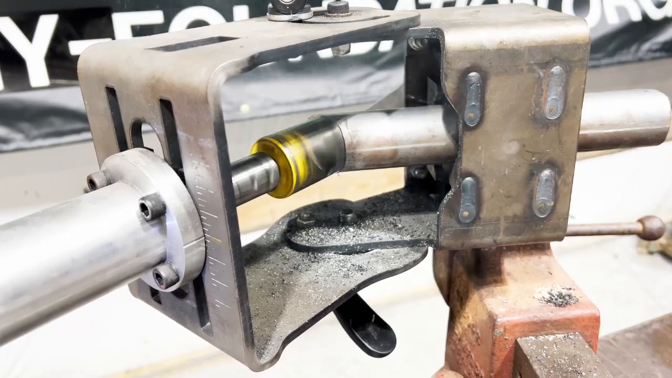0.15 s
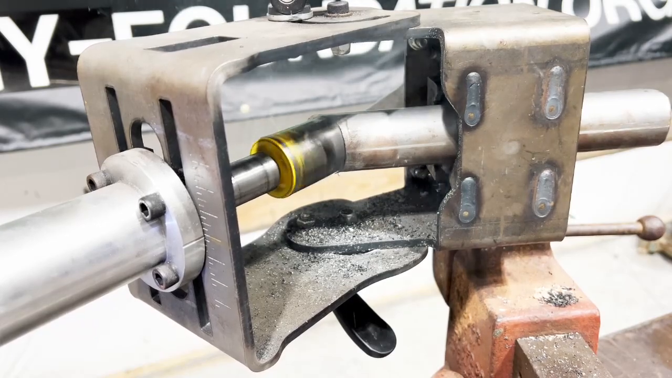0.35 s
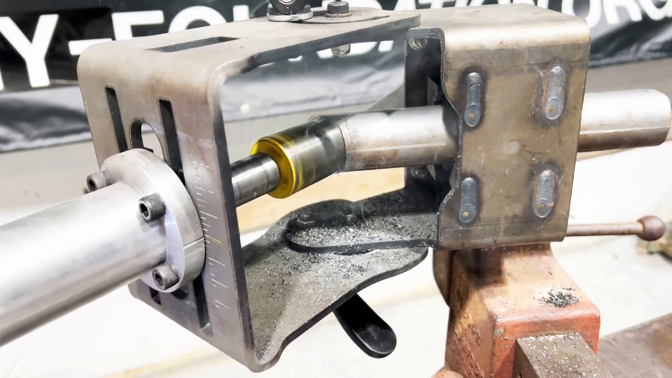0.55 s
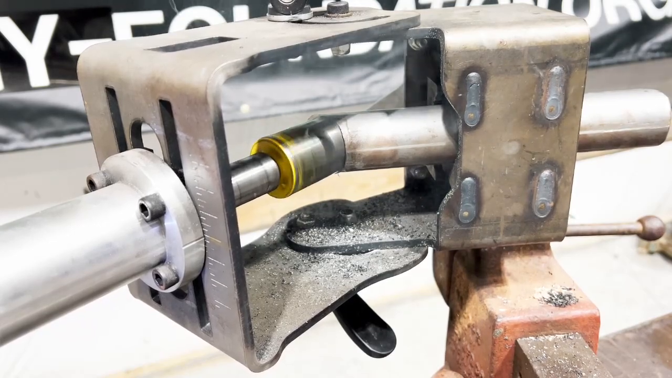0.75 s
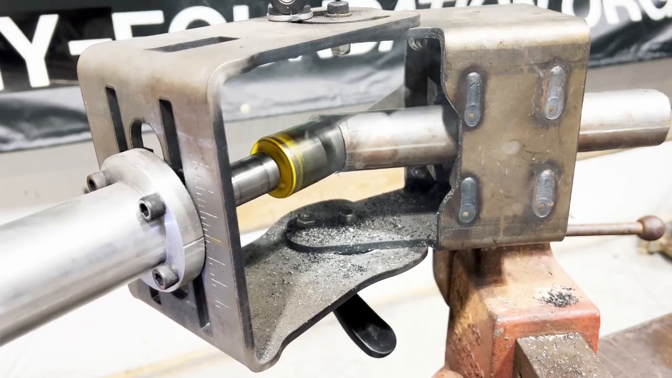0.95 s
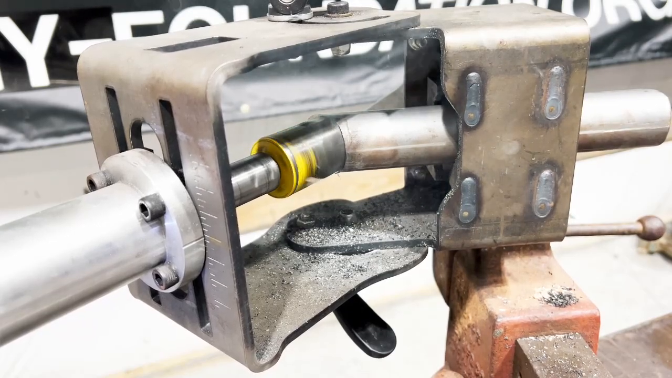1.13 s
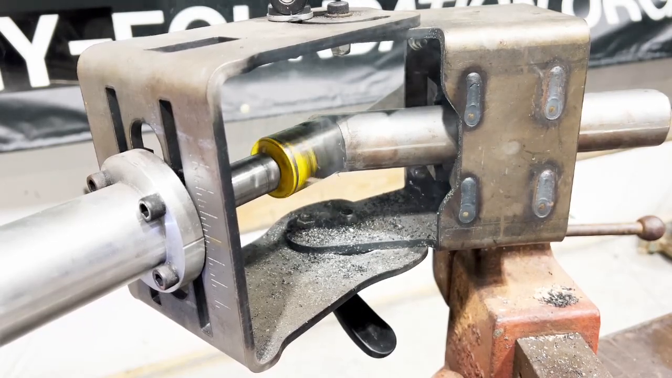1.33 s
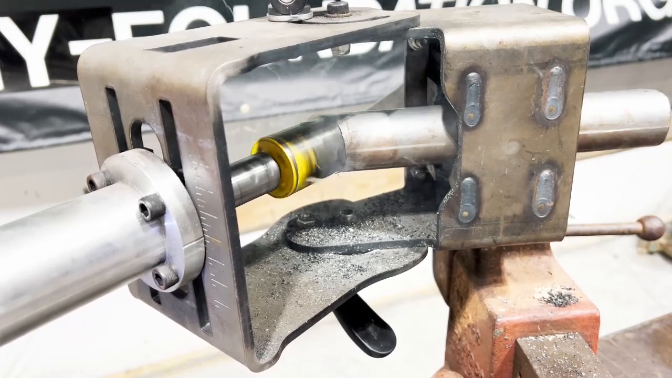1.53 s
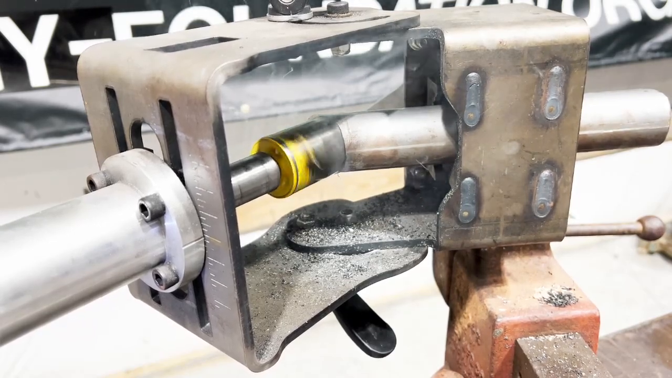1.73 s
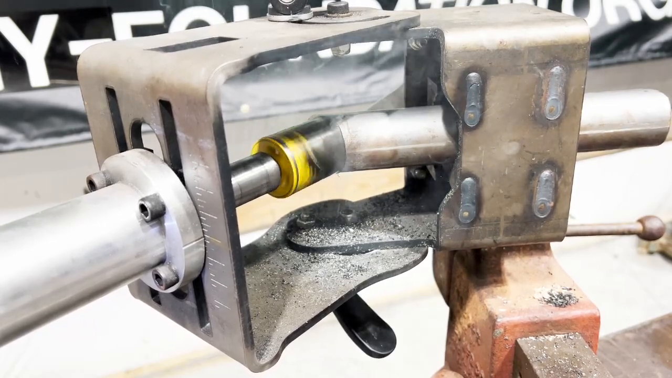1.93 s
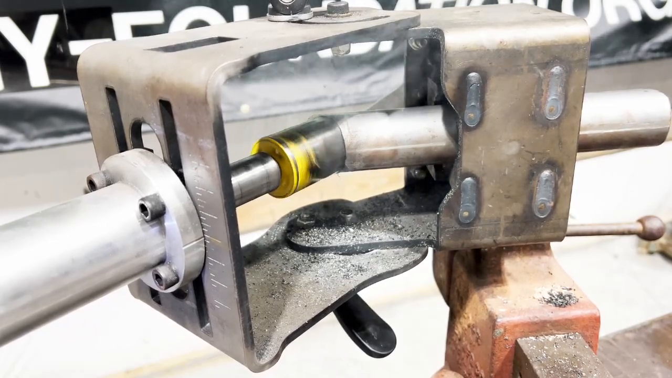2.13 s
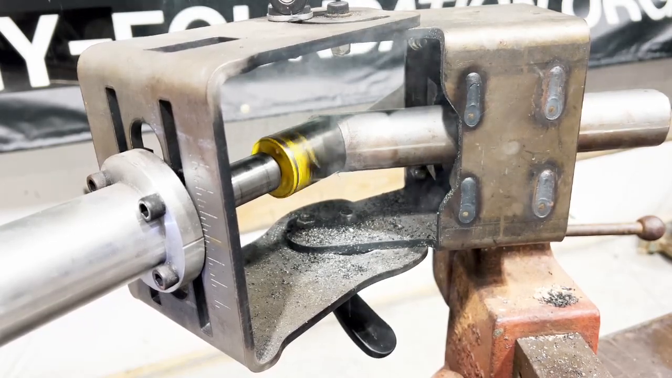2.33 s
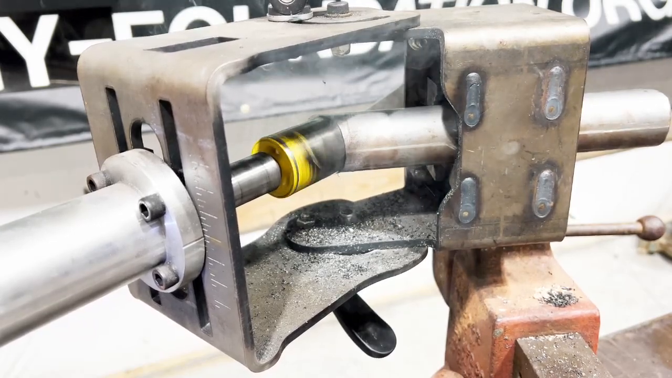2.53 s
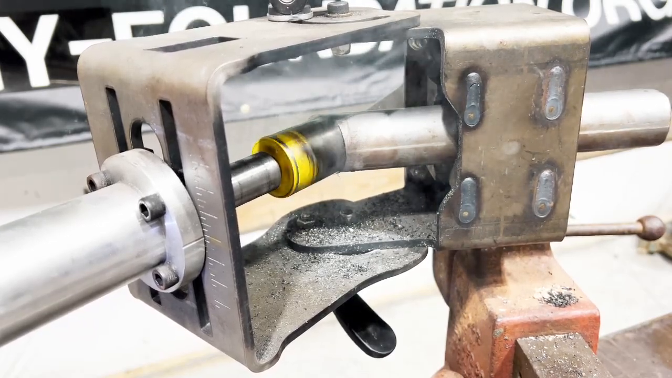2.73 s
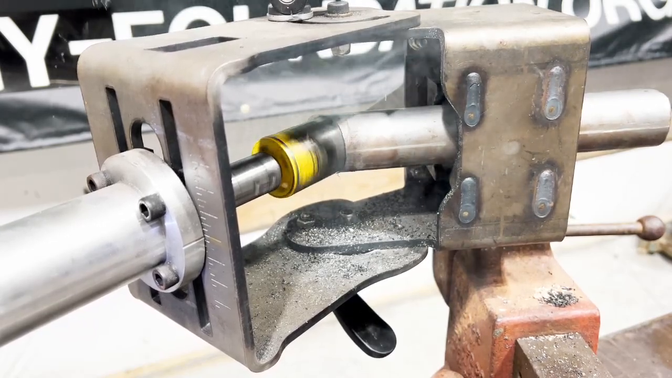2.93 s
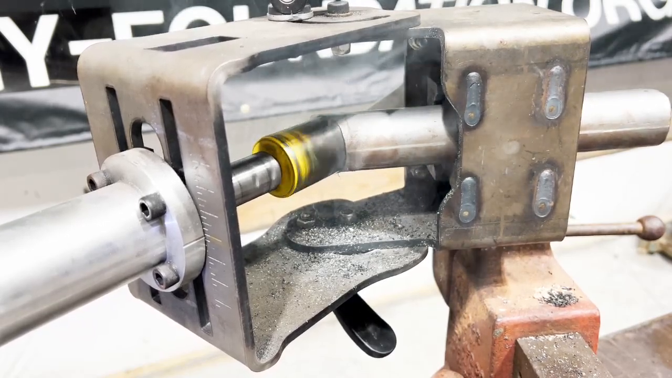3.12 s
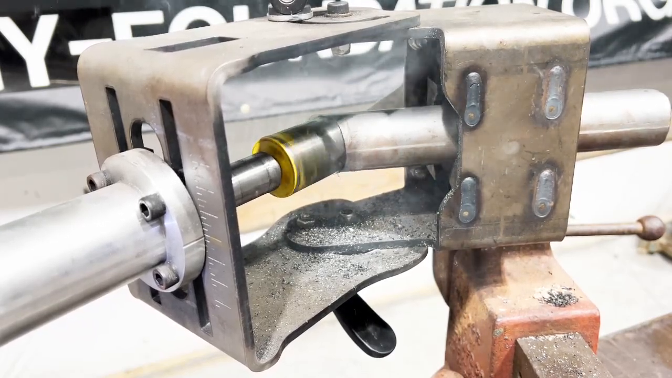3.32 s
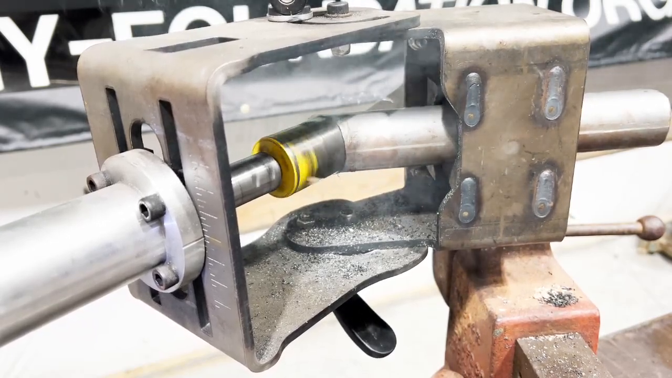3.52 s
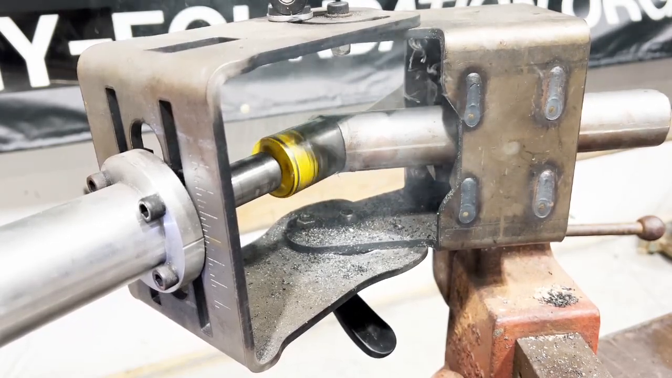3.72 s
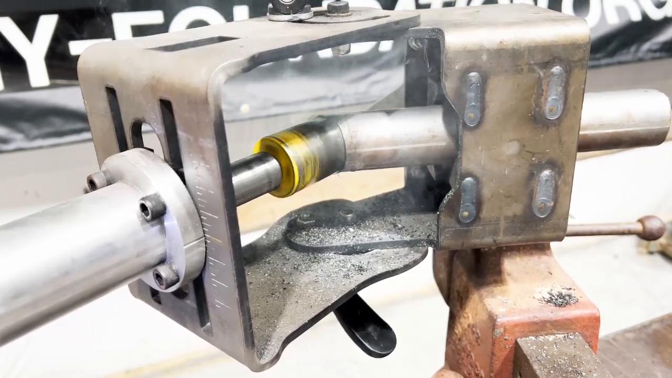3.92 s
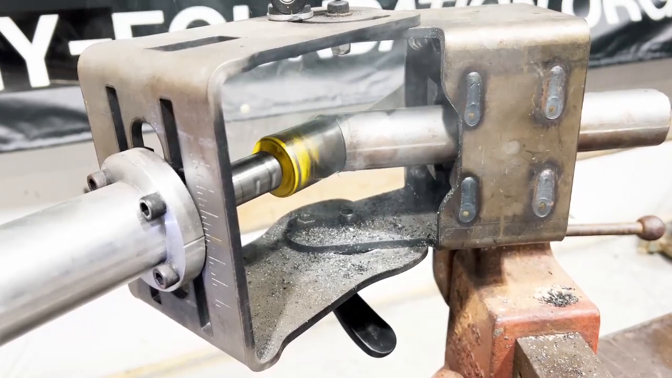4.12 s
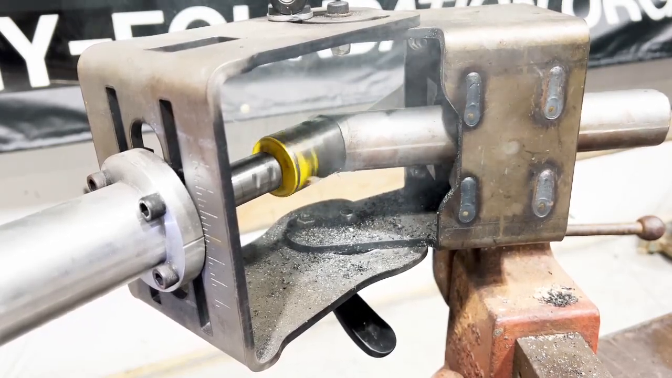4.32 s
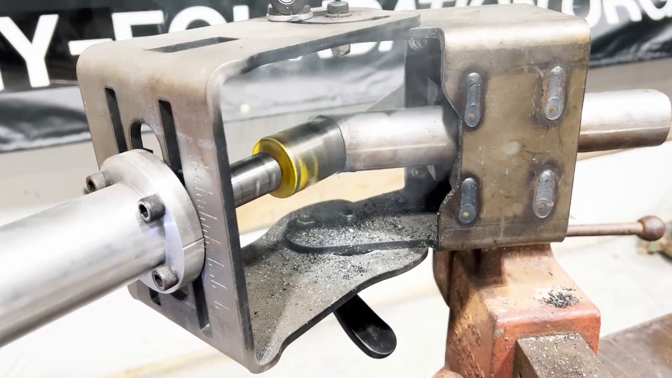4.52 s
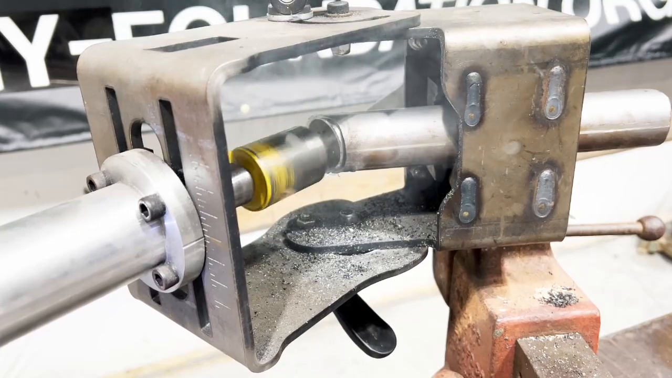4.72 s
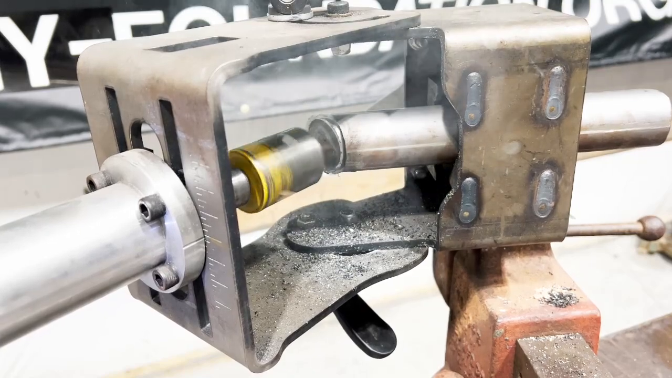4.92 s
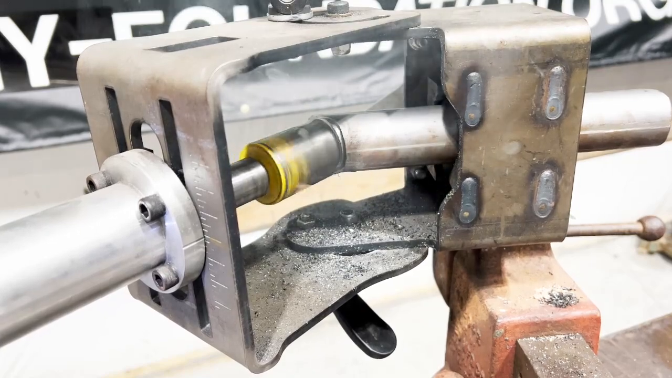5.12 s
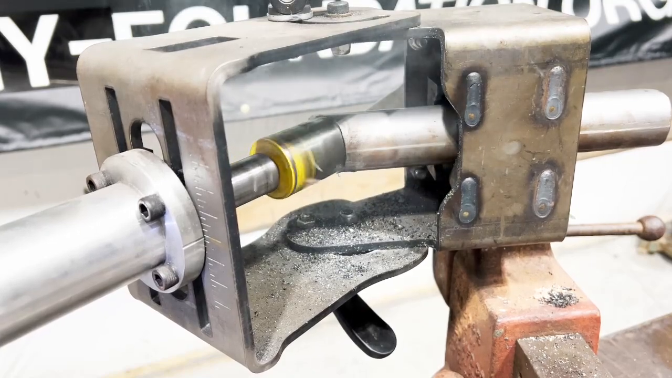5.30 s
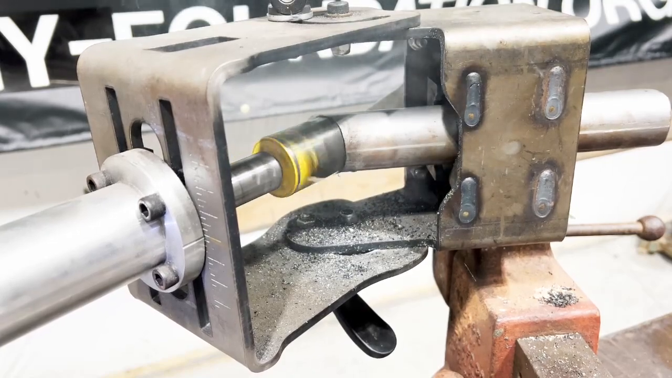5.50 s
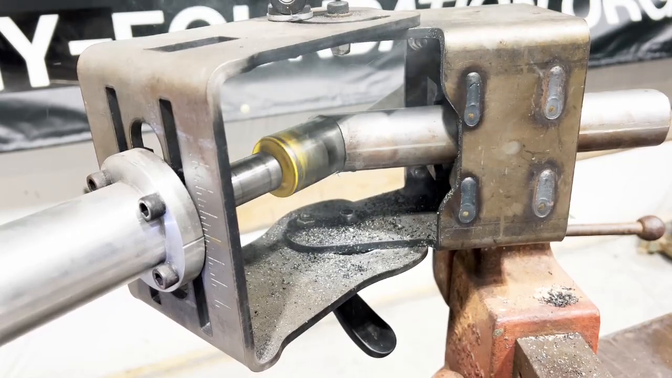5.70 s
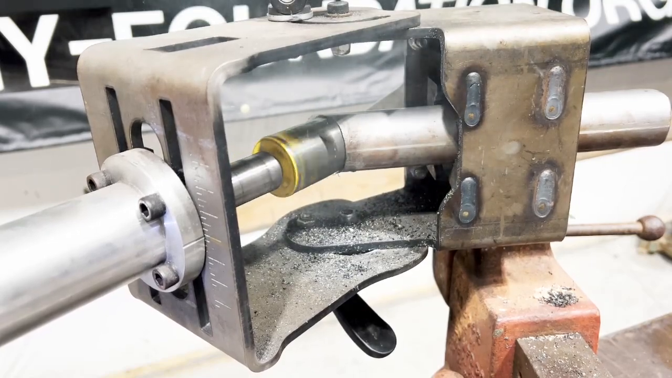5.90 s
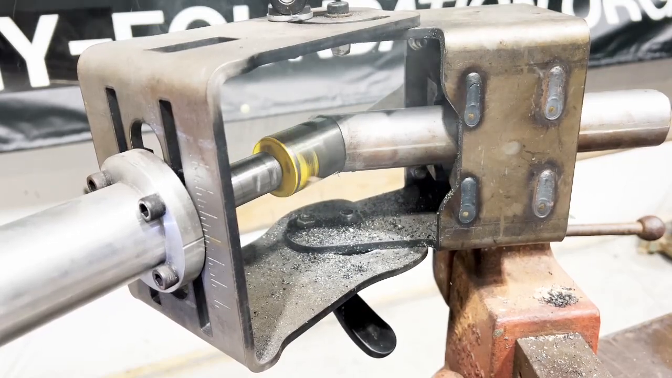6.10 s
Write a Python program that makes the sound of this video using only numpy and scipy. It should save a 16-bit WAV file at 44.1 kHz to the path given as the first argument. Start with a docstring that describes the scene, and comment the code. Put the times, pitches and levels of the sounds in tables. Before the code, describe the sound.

A drill-driven hole saw cuts a steel tube with rapid screeching chirps, backs off briefly as the drill whines, then bites again harder.

```python
"""Hole saw notching a steel tube

In a workshop, a small stereo microphone stands close to an oiled tube clamped in a jig. Once a turn the
saw's highest teeth bite: a short stick-slip squeal that sags in pitch and breaks into a rasp; other
teeth graze in between. The saw is drawn back for a moment, so that the electric drill whines freely,
then it judders on the rim and is fed in again harder."""
import sys
import numpy as np
from scipy import signal
from scipy.fft import rfft, irfft, next_fast_len
from scipy.io import wavfile

SR = 44100
rng = np.random.default_rng(int(sys.argv[2]) if len(sys.argv) > 2 else 0)


def master(y):
    """Save y as 16-bit WAV."""
    cut = np.clip(np.atleast_2d(y).T, -1, 1)
    pcm = np.round(cut * 32767)  # scale
    wavfile.write(sys.argv[1], SR, pcm.astype(np.int16))


N = 271215
TIME = np.arange(N) / SR
FFT_SIZE = 2 * next_fast_len(N // 2 + 4096)
BINS_HZ = np.maximum(np.fft.rfftfreq(FFT_SIZE, 1 / SR), 1)
FIRST_BITE_S, DRAWN_BACK_S, FED_IN_S = .058, 4.55, 5.6
PITCH_SCATTER = .011   # relative spread from turn to turn
DIRECT_ONLY = [[1], [0]]   # ahead of the microphone, a sound has two rows: direct and scattered

# steady rubbing in the kerf, which also stands for the load on the drill: (time [s], level [dB])
FEED = [(0, -36.5), (.4, -37), (.7, -38), (1.05, -37.5), (1.27, -38.5), (1.55, -38), (4.5, -36), (4.6, -37),
        (4.67, -36.5), (4.74, -52), (5.25, -51), (5.32, -35.5), (5.6, -35)]
# spindle speed, sinking as the cut deepens, bogging down at the breakthrough: (time [s], speed [turns/s])
SPINDLE = [(0, 14.347), (1.12, 15.238), (1.686, 14.505), (2.004, 15.332), (3.24, 14.044), (3.547, 14.355),
           (3.781, 13.751), (4.202, 14.309), (4.275, 11.805), (4.441, 14.615), (4.75, 15.596),
           (5.28, 15.596), (5.45, 15.231), (5.68, 15.413), (5.9, 14.636)]


def from_db(db):
    """Decibels to gain."""
    return 10 ** (np.asarray(db) / 20)


def rms_one(x):
    """Scale to unit power."""
    return x / np.sqrt(np.mean(x ** 2) + 1e-20)


def in_time(rows):
    """A (time, value) curve at every sample."""
    return np.interp(TIME, *np.transpose(rows))


def at_bins(rows, column=1):
    """A column of a frequency table at every bin."""
    rows = np.array(rows)
    return np.interp(np.log(BINS_HZ), np.log(rows[:, 0]), rows[:, column])


def phase_of(hz):
    """Running phase of a changing pitch, in radians."""
    return 2 * np.pi * np.cumsum(hz) / SR


def drift(rate_hz):
    """Smooth random wander of unit power."""
    sos = signal.butter(2, min(rate_hz, SR / 4), fs=SR, output="sos")
    return rms_one(signal.sosfilt(sos, rng.standard_normal(N + SR))[SR:])


def colour(x, spectrum):
    """Shape a sound by a spectrum; white noise keeps its power."""
    return irfft(rfft(x, FFT_SIZE) * rms_one(from_db(at_bins(spectrum))), FFT_SIZE)[..., :N]


def resonate(x, hz, width_hz):
    """One damped resonance."""
    r = np.exp(-np.pi * width_hz / SR)
    return signal.lfilter([1 - r, 0, r - 1], [1, -2 * r * np.cos(2 * np.pi * hz / SR), r * r], x)


def swells(times, levels_db, rise_s, fall_s):
    """Envelope of brief contacts, each with a bell-shaped rise and fall."""
    power = np.zeros(N)
    for when, db in zip(times, levels_db):
        near = slice(*np.searchsorted(TIME, [when - 4 * rise_s, when + 4 * fall_s]))
        t = TIME[near] - when
        power[near] += from_db(db) ** 2 * np.exp(-(t / np.where(t < 0, rise_s, fall_s)) ** 2)
    return np.sqrt(power)


def held(times, values):
    """Each sample takes the value of the nearest contact."""
    return values[np.searchsorted((times[1:] + times[:-1]) / 2, TIME)]


def once_a_turn(share=0):
    """Times at which a point of the saw, a share of a turn behind the highest teeth, meets the tube."""
    turns = np.cumsum(in_time(SPINDLE)) / SR
    turns -= np.interp(FIRST_BITE_S, TIME, turns)
    whole = np.arange(int(turns[-1]) + 1)
    times = np.interp(whole, turns, TIME)
    cutting = (times < DRAWN_BACK_S) | (times > FED_IN_S)
    return np.interp(whole[cutting] + share, turns, TIME)


def workshop(x, t60_s=.079):
    """Dense, slightly dull reflections from the bench and walls."""
    t = TIME[:SR // 2]
    tail = rng.standard_normal((2, len(t))) * from_db(-60 * t / t60_s) * (t > .004)
    tail /= np.sqrt(np.sum(tail ** 2, axis=1, keepdims=True))
    tail = signal.sosfilt(signal.butter(1, 7000, fs=SR, output="sos"), tail)
    return signal.fftconvolve(x, tail, axes=1)[:, :N]


def stereo_microphone(x):
    """Direct and scattered sound reach the two capsules with their own level and phase."""
    # the pair close to the jig: (frequency [Hz], left minus right [dB], coherence [0-1], left lead [rad])
    pair = [(100, 0, .9, 0), (650, 3, .2, 0), (1300, 0, .7, 0), (1850, -3, .8, 0), (2600, 0, .5, 0),
            (3600, 5, .25, -1), (4400, 6, .2, -.5), (5500, 4, .1, -2), (6450, 12, .4, -.4),
            (7400, 3, .2, 0), (8400, 1, .6, 0), (9300, 0, .9, -2), (10200, 0, .93, -3.1),
            (12000, 0, .92, -6.3), (15600, 0, .9, -12.6)]
    balance, coherence, lead = from_db(at_bins(pair, 1)), at_bins(pair, 2), at_bins(pair, 3)
    direct, scattered = rfft(x, FFT_SIZE) * np.sqrt([1 + coherence, 1 - coherence])
    left = (direct + scattered) * balance * np.exp(1j * lead)
    right = direct - scattered
    return irfft(np.array([left, right]) / np.sqrt(1 + balance ** 2), FFT_SIZE)[:, :N]


def drill():
    """Gear and motor lines follow the spindle over the fan's rush; under load they waver and weaken."""
    # gear and motor whine, running free at top speed: (frequency [Hz], relative level [dB])
    whine = [(97, -71), (210, -69), (1044, -60), (1513, -62), (2035, -66), (3031, -63), (4748, -64),
             (5055, -64), (5157, -60), (5510, -61)]
    # air noise of the cooling fan: (frequency [Hz], relative level [dB])
    fan = [(30, -31), (100, -19), (270, -6), (520, -8.5), (1200, -5), (2050, 1), (2700, -24.5), (4000, 2),
           (5300, 4.5), (7500, -5), (9000, -4.5), (12500, -17), (15500, -21)]
    speed = in_time(SPINDLE)
    load = np.interp(in_time(FEED), [-46, -37], [0, 1])
    waver = 1 + (.0009 + .037 * load) * drift(18)
    pace = speed / speed.max() * waver
    sound = from_db(-46.5) * colour(rng.standard_normal((2, N)), fan)
    for hz, db in whine:
        phase = phase_of(hz * pace) + .3 * drift(40)
        sound += np.sqrt(2) * from_db(db - 2 - 31 * load) * np.array([np.cos(phase), np.sin(phase)])
    return sound


def rumble(hz, width_hz):
    """A body mode shaken at random; unit power."""
    return rms_one(resonate(resonate(rng.standard_normal((2, N)), hz, width_hz), hz, width_hz))


def bending_wave(times, db):
    """A jolt runs along the steel with its highs ahead of its lows, and arrives as a falling thud."""
    age = np.maximum(TIME - held(times, times) + .003, 0)
    pitch = 48 + 520 * np.exp(-age / .0062)
    return swells(times + .00062, db, rise_s=.0038, fall_s=.011) * np.sin(phase_of(pitch)) * DIRECT_ONLY


def jig(times, drag_db):
    """Every bite jolts the frame; the arbor knocks back about half a turn later; the vice shudders."""
    # hard bites that shake the jig: (time [s], level [dB])
    hard_jolts = [(0.134, -64), (0.201, -49), (0.272, -59), (0.544, -49), (5.629, -41.5), (5.689, -53),
                  (5.76, -49), (5.827, -49), (5.891, -49), (5.962, -44), (6.032, -40), (6.099, -46)]
    # knock of the arbor in its guide: (time [s], level [dB])
    arbor_play = [(0, -48.5), (2.1, -49), (2.4, -58), (2.8, -52), (3.65, -52), (4.2, -58), (5.6, -55),
                  (5.8, -47)]
    # shudder of jig and vice: (time [s], level [dB])
    vice_shake = [(0, -64), (4.4, -67.5), (4.8, -67.5), (5.26, -91), (5.35, -52.5), (5.6, -61)]
    jolts = bending_wave(*np.transpose(hard_jolts)) + bending_wave(times + .0028, drag_db - 41)
    rebounds = swells(times + .038, np.zeros(len(times)), rise_s=.005, fall_s=.016)
    knocks = from_db(in_time(arbor_play)) * rebounds * rumble(hz=637, width_hz=99)
    shudder = from_db(in_time(vice_shake)) * rumble(hz=112.3, width_hz=38)
    frame = from_db(in_time(FEED) - 23.5) * rumble(hz=260, width_hz=94)
    return jolts + knocks + shudder + frame


def judder(hz=94):
    """Pressed lightly on the rim, the saw sets the whole vice growling around one low pitch."""
    # the growl before the saw bites again: (time [s], level [dB])
    growl = [(5.28, -84), (5.33, -52), (5.41, -51), (5.51, -51), (5.57, -77)]
    db = np.interp(TIME, *np.transpose(growl), left=-np.inf, right=-np.inf) + 2.5 * drift(18)
    pitch = hz * (1 + .089 * drift(13.6))
    return from_db(db) * np.sin(phase_of(pitch)) * DIRECT_ONLY


def tube(x):
    """Friction noise also rings the steel."""
    # modes of tube and saw cup: (frequency [Hz], width [Hz], gain [dB])
    modes = [(1196, 17, 4), (2010, 37, -8), (2428, 26, -1.5), (3353, 79, 8.5), (5180, 150, 3.5),
             (5850, 40, 2.5), (6530, 320, 2), (9100, 37, -7)]
    return x + sum(from_db(db) * resonate(x, hz, width) for hz, width, db in modes)


def rubbing():
    """Grainy scraping in the kerf, swelling about half a turn after each bite."""
    # spectrum of rubbing teeth: (frequency [Hz], relative level [dB])
    scrape = [(30, -51), (300, -9.5), (470, -18), (850, -8), (1750, 3), (2350, 1), (2800, -5), (4500, -5),
              (5600, 3.5), (6550, -4.5), (7300, -11), (9400, -4.5), (12600, -24), (15500, -13.5)]
    times = once_a_turn()
    half_turn = swells(times + .042, np.zeros(len(times)), rise_s=.0046, fall_s=.0018)
    grains = rng.standard_normal((2, N)) * from_db(1.2 * drift(530) + 3 * drift(63))
    return from_db(in_time(FEED)) * (1 + .5 * half_turn) * rms_one(tube(colour(grains, scrape)))


def stick_slip(pitch_hz, rough, jitter, flutter, tilt_db):
    """Teeth catch and slip: a fluttering harmonic squeal, and a spit of noise at each slip."""
    # squeal harmonics, from the fundamental up: (relative level [dB])
    partials = [1.5, 4, 1.5, -14, -2, -12, -12.5, -18]
    # spectrum of biting teeth: (frequency [Hz], relative level [dB])
    rasp = [(400, -29.5), (1100, -30), (1700, -9.5), (2150, -6.5), (2850, -11), (3450, -14), (4300, -4),
            (5400, -2), (6500, -2.5), (7500, -9), (9300, -5), (10600, -10.5), (11800, -15.5), (14000, -18),
            (15500, -19.5)]
    phase = phase_of(pitch_hz * (1 + jitter * drift(449)))
    tone = np.zeros((2, N))
    for k, db in enumerate(partials, 1):
        # the direct part flutters; the scattered part comes with ever-changing strength and sign
        wobble = np.array([1 + flutter * drift(166), 1.395 * drift(130)])
        tone += from_db(db + tilt_db * np.log2(k)) * wobble * [np.cos(k * phase), np.sin(k * phase)]
    slips = rng.standard_normal((2, N)) * (1 + .41 * np.cos(phase)) * from_db(3.2 * drift(520))
    spit = tube(colour(slips, rasp))
    return np.sqrt(1 - rough ** 2) * rms_one(tone) + rough * rms_one(spit)


def grazes(graze_hz=2096, scatter_db=2.16):
    """Teeth on the far side of the rim give short, hoarse chirps that sag in pitch."""
    # a tooth grazes once a turn, strongly until the kerf is established: (time [s], level [dB])
    graze_levels = [(0, -22), (.42, -28.5), (.5, -29.5), (1.85, -40.5), (2.3, -42), (6.1, -41)]
    # single teeth catch as the saw skids, leaves or returns: (time [s], pitch [Hz], level [dB])
    catches = [(0.717, 2065, -24.5), (1.314, 2097, -26), (4.554, 1880, -26.5), (5.309, 2567, -27.5),
               (5.354, 2447, -29.5), (5.441, 2157, -27), (5.459, 1730, -20), (5.493, 2050, -24.5),
               (5.544, 2047, -23), (5.6, 2140, -24), (5.658, 2166, -25.0)]
    times = once_a_turn(share=.63)
    strong, sharp = rng.standard_normal((len(times), 2)).T
    hz = graze_hz * (1 + PITCH_SCATTER * sharp)
    db = np.interp(times, *np.transpose(graze_levels)) + scatter_db * strong
    times, hz, db = np.transpose(sorted([*zip(times, hz, db), *map(tuple, catches)]))
    age = TIME - held(times, times)
    pitch = held(times, hz) * (1 - .049 * np.tanh(age / .0124))
    chirp = stick_slip(pitch, rough=.72, jitter=.0244, flutter=.35, tilt_db=-7.5)
    return swells(times, db, rise_s=.0031, fall_s=.0044) * chirp


def each_bite(scatter_db=.5):
    """Time, pitch, squeal level, drag delay and drag level of each bite; skids stifle the squeal most."""
    # how the teeth grip: (time [s], squeal level [dB], drag level [dB], pitch [Hz], drag delay [s])
    grip = [(0.049, -19, -23.5, 1855, 0.0072), (0.201, -16.5, -19.5, 1806, 0.01),
            (.85, -18.5, -19.5, 1788, 0.0045), (1.3, -16, -17.5, 1788, 0.0082),
            (1.598, -16, -24.5, 1854, 0.0093), (2.102, -17.5, -18.5, 1824, 0.0099),
            (2.698, -14, -20, 1843, 0.0091), (3.4, -16.5, -20.5, 1890, 0.0079),
            (3.749, -15, -18, 1884, 0.007), (4.05, -17, -18, 1899, 0.007), (4.411, -15, -20.5, 1964, .0068),
            (4.532, -18.5, -26.5, 1752, 0.011), (5.62, -15, -15, 1792, 0.0052),
            (5.781, -15.5, -19, 1866, 0.0045), (6.1, -14.5, -15, 1833, 0.0031)]
    # turns on which the teeth skid instead of biting: (time [s], grip lost [dB])
    skids = [(.47, 13), (.61, 2.5), (.67, 29), (.81, 31), (.94, 15), (1.07, 16), (1.14, 4), (1.2, 7),
             (1.27, 45), (1.4, 9), (1.47, 8.5), (2.01, 11.5), (2.21, 5), (2.34, 4), (2.82, 2.5), (2.95, 1),
             (3.24, 1), (3.52, 1.5)]
    times = once_a_turn()
    lost_db = np.zeros(len(times))
    for when, db in skids:
        lost_db[np.argmin(abs(times - when))] = db
    grip_times, *columns = np.transpose(grip)
    squeal_db, drag_db, hz, delay = [np.interp(times, grip_times, column) for column in columns]
    hard, sharp = rng.standard_normal((len(times), 2)).T
    # a tooth that squeals harder has less left to drag
    squeal_db += scatter_db * hard - 7 * lost_db
    drag_db -= scatter_db * hard + lost_db
    return times, hz * (1 + PITCH_SCATTER * sharp), squeal_db, delay, drag_db


def bites(times, hz, squeal_db, delay, drag_db):
    """The squeal comes first; as the tooth digs in, it turns ragged and slides down into a dull groan."""
    # how ragged the stick-slip is: (time [s], roughness [0-1])
    raggedness = [(0, 0.41), (2.5, 0.3), (3.3, 0.32), (4.5, 0.46), (6.15, 0.25)]
    rough = in_time(raggedness)
    age = TIME - held(times, times)
    pitch = held(times, hz) * (1 - 7 * np.clip(age - .003, 0, .022))   # sags 15 % in 22 ms
    squeal = stick_slip(pitch, rough, jitter=.009, flutter=.24, tilt_db=2.56)
    drag = stick_slip(pitch, rough + .52, jitter=.01952, flutter=.83, tilt_db=-5)
    # the fundamental builds up before the overtones and outlasts them
    groan = np.sin(phase_of(pitch * (1 + .01864 * drift(431)))) * DIRECT_ONLY
    return (swells(times, squeal_db, rise_s=.0024, fall_s=.0032) * squeal
            + swells(times + delay, drag_db, rise_s=.0035, fall_s=.0035) * drag
            + swells(times + delay, drag_db - 12, rise_s=.0074, fall_s=.011) * groan)


def scene():
    """Saw, jig and drill close to the microphone, with the workshop behind them."""
    times, hz, squeal_db, delay, drag_db = each_bite()
    saw = bites(times, hz, squeal_db, delay, drag_db) + grazes() + rubbing()
    near = stereo_microphone(saw + jig(times, drag_db) + judder() + drill())
    return near + from_db(-6.5) * workshop(near)


def record(dry):
    """The recorder's input rounds the sharpest peaks, and the top is cut steeply at 15.8 kHz."""
    return signal.sosfilt(signal.ellip(12, .1, 80, 15800, fs=SR, output="sos"), np.tanh(dry))


dry = scene()
out = record(dry)
master(out)
```